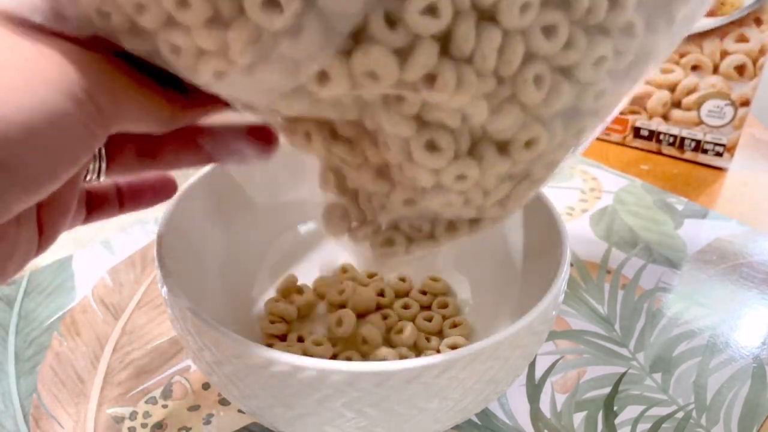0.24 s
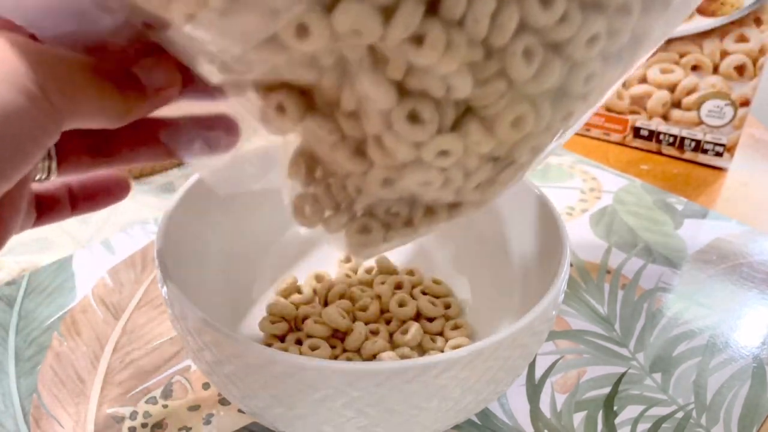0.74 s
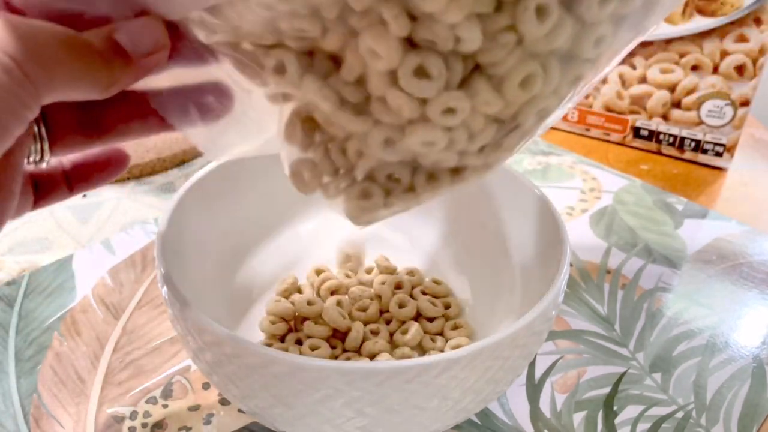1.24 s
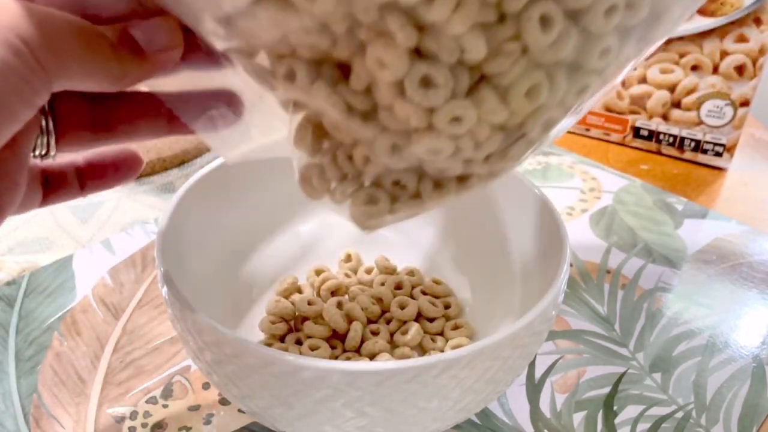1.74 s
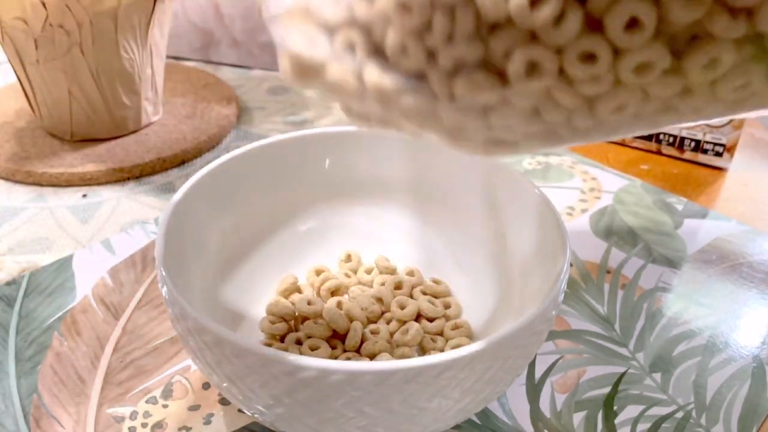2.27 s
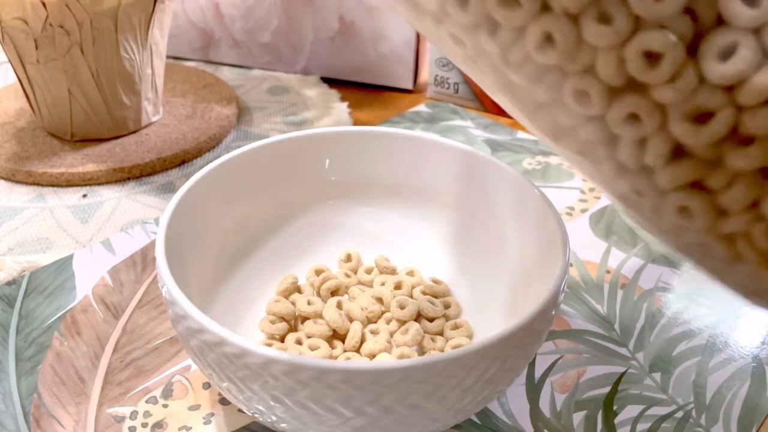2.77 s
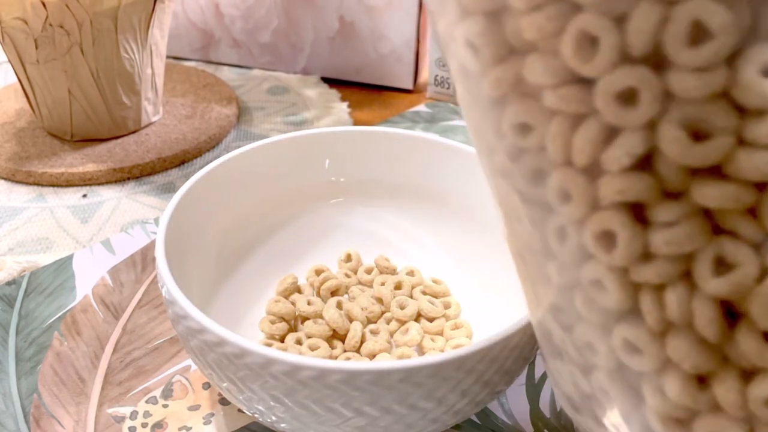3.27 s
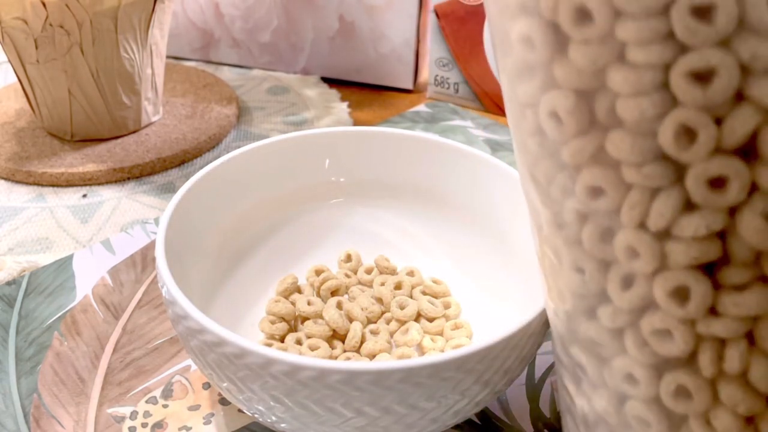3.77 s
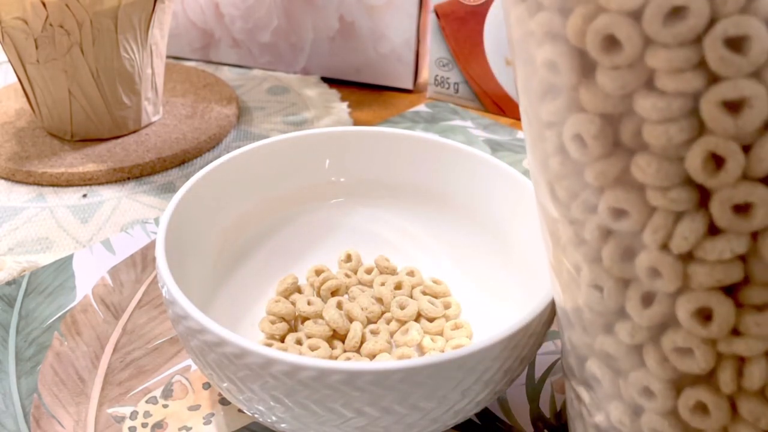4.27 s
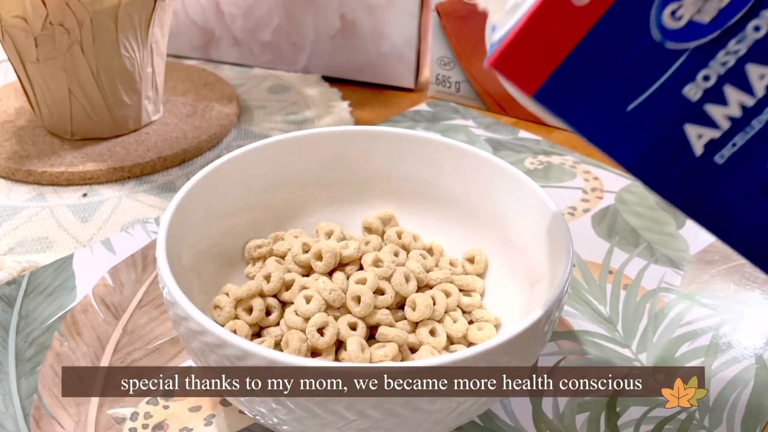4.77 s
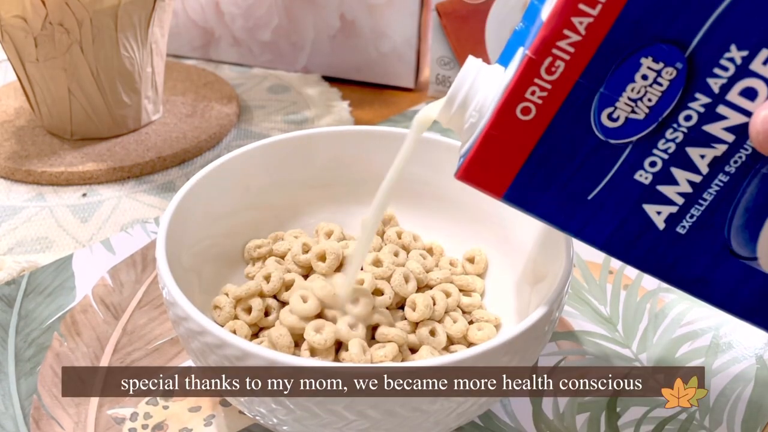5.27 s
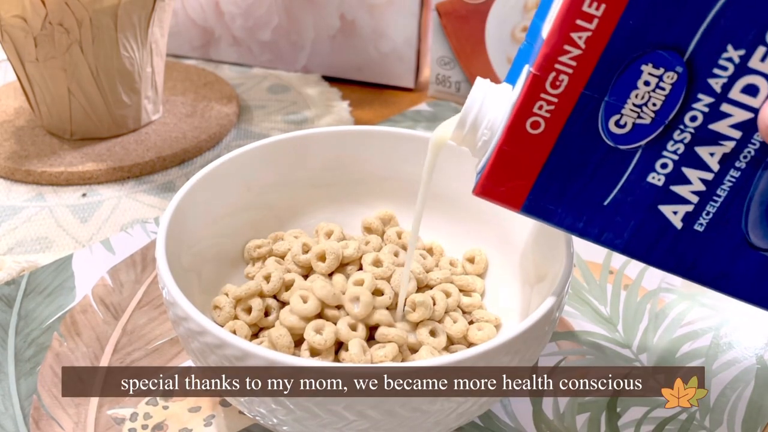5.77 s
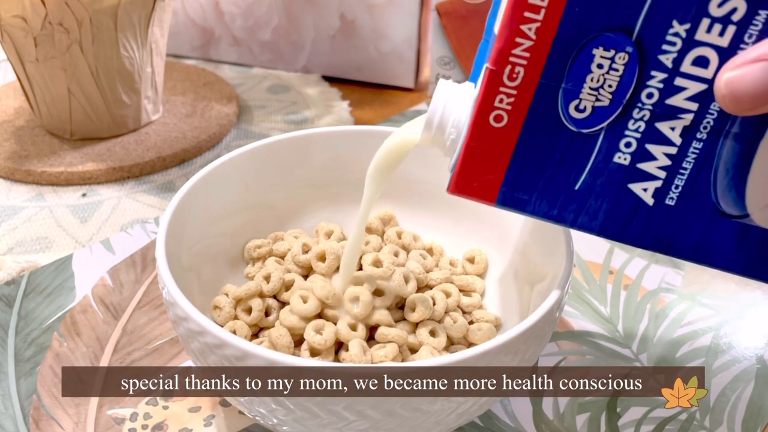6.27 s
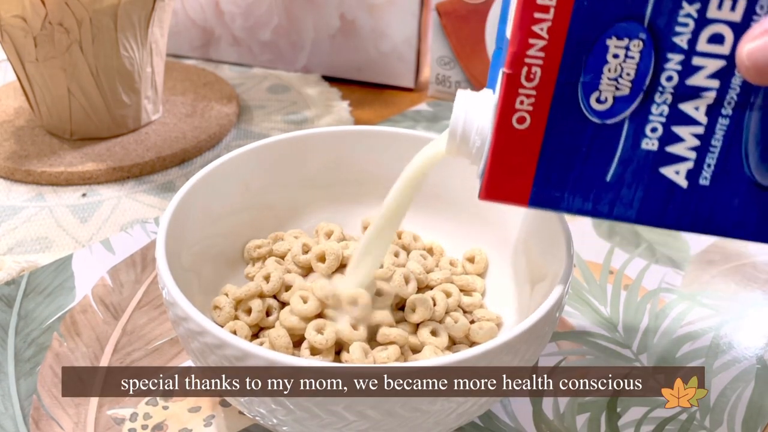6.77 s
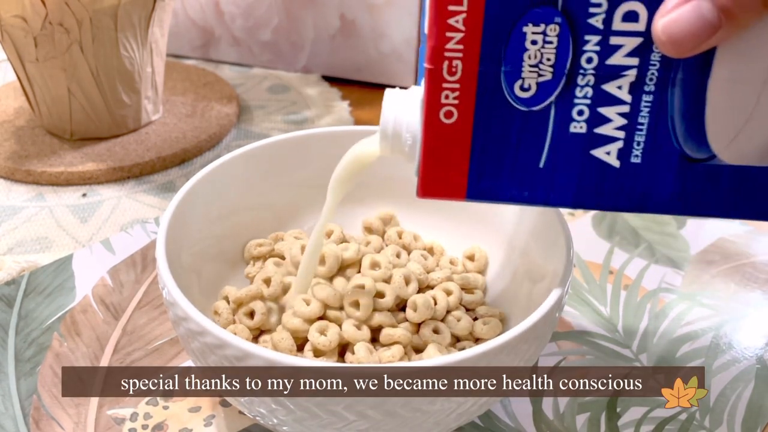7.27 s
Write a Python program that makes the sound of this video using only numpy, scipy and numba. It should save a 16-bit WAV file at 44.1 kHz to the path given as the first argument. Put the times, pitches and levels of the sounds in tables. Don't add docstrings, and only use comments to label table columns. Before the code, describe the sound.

Hard little cereal rings rattle in jerky bursts against film and each other, a few landing on bare ceramic with a bright ping. A near-pause, then the bag's load slumps and crackles as it is put down, slightly left of centre. The sound drops suddenly to faint room air and low rumble; milk falls in small wet gushes, growing livelier near the end. Close stereo phone pickup, indoors, almost no echo.

```python
import sys
import numpy as np
from scipy import signal
from scipy.fft import rfft, irfft
from scipy.io import wavfile
from scipy.ndimage import uniform_filter1d
from numba import njit

SR = 44100
rng = np.random.default_rng(int(sys.argv[2]) if len(sys.argv) > 2 else 0)


def boost_factor(decibels):
    exponent = np.asarray(decibels, float) / 20
    return 10 ** exponent


def file_out(sig):
    cols = np.atleast_2d(sig).T
    lim = np.clip(cols, -1, 1)
    pcm = np.round(lim * 32767).astype(np.int16)
    wavfile.write(sys.argv[1], SR, pcm)


N = 331632
TIME = np.arange(N) / SR
HZ = np.fft.rfftfreq(N, 1 / SR)
CUT_S = 4.532

# [t/s, hold/s, rattle level/dB]
SHAKES = [(0.0, 0.016, -32), (0.2, 0.076, -35), (0.405, 0.0013, -30.5), (0.482, 0.0042, -34),
          (0.59, 0.0044, -35.5), (0.676, 0.042, -36.5), (0.784, 0.011, -32.5), (0.87, 0.12, -32.5),
          (1.05, 0.021, -33.5), (1.146, 0.0039, -33.5), (1.21, 0.12, -34.5), (1.398, 0.01, -34.5),
          (1.5, 0.0026, -31.5), (1.577, 0.016, -33), (1.675, 0.0011, -33), (1.738, 0.023, -45)]
# [t/s, level/dB]
DRAG = [(0.0, -35), (1.698, -70), (1.81, -48.5), (2.11, -54.5), (2.136, -43.5), (2.341, -52),
        (2.612, -36.5), (2.92, -32.5), (3.02, -36.5), (3.23, -37), (3.334, -32), (3.44, -37.5),
        (3.52, -36.5), (3.673, -37.5), (3.779, -31), (3.934, -47.5), (4.26, -54), (4.526, -58)]
# [t/s, level/dB rel rattle]
TAUT = [
    (0, -9.5),
    (1.4, -21),
    (2.3, -21.5),
    (3.2, -12.5),
    (4.526, -11),
]
# [t/s, left minus right level/dB]
BAG_PAN = [
    (0, 2.5),
    (1.7, 3),
    (2.5, 2),
    (3.3, 0.5),
    (3.7, 2),
    (4.2, 1),
    (7.52, 6),
]
# [f/Hz, level/dB per Hz]
RATTLE = [(150, -9.5), (280, -7.5), (500, -9), (900, -6), (1400, -2.5), (2500, -5.5), (4000, -10),
          (6000, -14.5), (8000, -16), (11000, -21.5), (13500, -25)]
RATTLE_TOP = [(15000, -23), (15800, -27)]
# [f/Hz, level/dB per Hz]
KITCHEN = [(15, -32.5), (25, 0.5), (161, -1), (200, -7.5), (242, -4.5), (309, -12), (1400, -36),
           (4030, -48), (5000, -43), (5570, -50.5), (16000, -47)]
# [t/s, peak level/dB]
TICKS = [(0.014, -21), (0.0416, -24.5), (0.106, -19), (0.142, -22), (0.195, -23), (0.2164, -22),
         (0.2339, -21), (0.3306, -22.5), (0.348, -23), (0.378, -20), (0.399, -17), (0.5084, -26),
         (0.5521, -30), (0.5694, -20), (0.596, -20), (0.6165, -27), (0.6559, -27), (0.6704, -18.5),
         (0.7013, -20.5), (0.7013, -15), (0.7143, -13), (0.7722, -18), (0.794, -21), (0.852, -21.5),
         (0.91, -15), (0.9477, -19.5), (0.9725, -19.5), (1.0316, -22.5), (1.059, -17), (1.118, -23.5),
         (1.1243, -19.5), (1.1443, -22), (1.1623, -22.5), (1.193, -30), (1.1926, -15.5), (1.2745, -26),
         (1.3174, -19), (1.398, -23.5), (1.3975, -17.5), (1.4316, -23.5), (1.4601, -27), (1.477, -21.5),
         (1.495, -19), (1.511, -16), (1.5489, -28.5), (1.5673, -25), (1.5808, -19), (1.613, -26),
         (1.6396, -25), (1.684, -28.5), (1.6836, -18), (1.743, -34)]
LATE_TICKS = [(1.745, -31), (1.83, -40), (1.9138, -17), (1.9828, -42.5), (2.0092, -35.5), (2.0801, -38),
              (2.1305, -28), (2.137, -23.5), (2.1913, -30.5), (2.2043, -22), (2.2602, -32), (2.4045, -30),
              (2.4053, -31), (2.43, -33), (2.46, -23), (2.4805, -29), (2.5335, -30.5), (2.5899, -29),
              (2.6124, -25.5), (2.6807, -19), (2.76, -25), (2.8466, -22.5), (2.929, -17), (3.1246, -26.5),
              (3.155, -27.5), (3.1561, -22), (3.213, -23.5), (3.2977, -20), (3.3178, -19), (3.5893, -24.5),
              (3.796, -20.5), (3.8361, -20), (3.9566, -31), (4.0227, -35.5), (4.0404, -24.5),
              (4.155, -30.5), (4.2496, -43.5), (4.2888, -31.5), (4.3619, -35), (4.3675, -37), (4.39, -42),
              (4.4437, -39.5), (4.509, -49)]
# [t/s, peak level/dB]
SPATTER = [(5.0593, -62), (5.0577, -57), (5.0872, -50.5), (5.1656, -58.5), (5.2262, -58), (5.2458, -55),
           (5.3716, -59), (5.817, -74), (5.9814, -64.5), (6.1087, -62.5), (6.191, -63), (6.2984, -75),
           (6.4278, -72), (6.4701, -77), (6.4706, -64), (6.5199, -78), (6.7423, -57), (6.7863, -55),
           (6.8838, -56.5), (6.9142, -39), (7.0482, -47), (7.0705, -54.5), (7.1425, -54), (7.154, -53),
           (7.167, -45), (7.2401, -55), (7.2463, -48), (7.2648, -41.5), (7.3686, -57), (7.4229, -67.5),
           (7.4448, -63), (7.4655, -51.5), (7.4924, -53), (7.4938, -47.5)]
# [t/s, peak level/dB]
TINKS = [(0.0152, -20.5), (0.0548, -43.5), (0.1049, -22.5), (0.233, -19), (0.262, -42.5), (0.2796, -25.5),
         (0.3508, -24), (0.4046, -27), (0.439, -35.5), (0.612, -35.5), (0.656, -38.5), (1.2755, -29)]
# [f/Hz, level/dB, t60/s]
BOWL = [(5883, -9, 0.37), (5920, 0, 0.12), (11900, -21.5, .07), (13200, -17.5, .07), (11100, -19, .08)]
# [t/s, peak level/dB, f/Hz, bright part/dB rel]
SNAPS = [(0.0155, -16.5, 5960, -8.5), (0.106, -17, 6200, -12.5), (0.141, -22, 5810, -13.5),
         (0.2326, -21.5, 6085, -3.5), (0.6574, -25, 6030, -5.5), (0.7007, -19, 2830, -10),
         (0.7713, -20, 2484, -8.5), (0.852, -15.5, 2080, -7), (0.9729, -12, 2256, -7.5),
         (1.0595, -19.5, 2750, -8.5), (1.1243, -17, 3656, -9), (1.8498, -30, 1430, -28),
         (1.9131, -19, 1224, -10), (1.984, -31.5, 790, -35), (2.0087, -29, 1770, -7.5),
         (2.1196, -34.5, 1210, -12.5), (2.1354, -20.5, 2730, -9), (2.1916, -25.5, 2263, -12.5),
         (2.2044, -21.5, 5830, -8), (2.4048, -26.5, 1276, -13.5), (2.46, -26.5, 1930, -16.5),
         (2.613, -19.5, 1404, -9.5), (2.679, -21, 1470, -10.5), (2.7615, -22.5, 1548, -13),
         (3.1562, -15.5, 2400, -8), (3.2124, -25.5, 2266, -17), (3.3169, -19.5, 1918, -3),
         (3.5222, -19.5, 1337, -21), (3.8347, -25.5, 1240, -3), (4.0402, -21, 6100, -10.5)]
SETTLE = [(2.079, -35, 1260, -19), (2.26, -29, 5070, -11), (2.2752, -29.5, 4540, -6),
          (2.4305, -30, 1440, -5), (2.557, -33.5, 1650, -15), (3.9584, -31.5, 900, 2),
          (4.1532, -37, 2310, -8), (4.18, -36.5, 1370, 38), (4.299, -34, 2370, -9.5),
          (4.3674, -36.5, 2350, -19), (4.3902, -36.5, 4600, -4), (4.4432, -34, 1780, -9)]
# [t/s, peak level/dB, f/Hz, bright part/dB rel]
DROPS = [(5.0594, -45.5, 2060, -6), (5.1246, -44, 2140, -7.5), (5.2279, -56.5, 1670, -16),
         (5.2459, -51, 4180, -6.5), (5.3712, -56, 2324, -14), (6.1089, -61.5, 4110, -15),
         (6.4705, -58, 940, -9.5), (6.7444, -56, 1040, 4), (6.7844, -43.5, 856, -10),
         (6.8168, -51, 1990, -15), (6.8841, -54.5, 2260, 3), (6.9143, -40, 1380, -10.5),
         (7.0463, -54, 1160, -9), (7.0702, -50, 2500, -12), (7.154, -49.5, 5000, 4),
         (7.1654, -38, 4900, -5), (7.2403, -49.5, 1710, -3), (7.2656, -41, 2540, -7.5),
         (7.3231, -48.5, 1730, -7.5), (7.4653, -51.5, 1720, -15), (7.4878, -48, 1950, -9)]
STRAYS = [
    (5.981, -69, 3840, -12),
    (6.192, -66.5, 1080, -8),
]
# [t/s, peak level/dB]
CLICKS = [(0.399, -16.5), (0.462, -24.5), (0.4845, -20.5), (0.5686, -19), (0.5959, -22.5), (0.671, -18),
          (0.7137, -14), (0.7945, -14.5), (0.896, -18), (0.909, -16.5), (0.9487, -18.5), (1.0222, -22.5),
          (1.1435, -16), (1.194, -14.5), (1.2194, -17), (0.1183, -15), (1.2994, -21), (1.3203, -17),
          (1.3863, -26.5), (1.3992, -16), (1.433, -26), (1.46, -22.5), (1.509, -20.5), (1.567, -25),
          (1.614, -19.5), (1.6801, -24.5)]
# [t/s, peak level/dB]
CREASES = [(0.0418, -28), (0.1037, -22.5), (0.2189, -24), (0.3456, -27), (0.3985, -18.5), (0.4065, -20.5),
           (0.5067, -33), (0.5701, -23), (0.6699, -23.5), (0.7726, -23.5), (0.7931, -16.5), (0.8526, -27.5),
           (0.8589, -22), (1.058, -30), (1.1238, -21), (1.1627, -24.5), (1.1927, -19), (1.3962, -19),
           (1.4311, -24.5), (1.476, -20.5), (1.511, -18.5), (1.5798, -20.5), (1.6152, -27.5), (1.6851, -20)]
FOLDS = [(2.4046, -36), (2.4588, -27.5), (2.534, -23.5), (2.8452, -23), (2.933, -25.5), (2.971, -29),
         (3.1466, -21.5), (3.5229, -28), (3.5694, -29), (3.743, -27), (3.794, -30), (3.8084, -27.5),
         (3.8355, -25), (4.04, -31.5), (4.369, -32)]
# [t/s, peak level/dB]
KNOCKS = [(0.119, -22), (0.201, -22), (0.371, -23), (0.399, -21), (0.463, -24), (0.484, -22), (0.569, -25),
          (0.596, -24), (0.656, -30), (0.67, -25), (0.714, -19), (0.758, -25), (0.781, -24), (0.793, -21),
          (0.852, -25), (1.022, -27), (1.113, -26), (1.193, -21), (1.219, -21), (1.279, -21), (1.301, -23),
          (1.378, -26), (1.4, -24), (1.461, -28), (1.569, -23), (1.744, -33), (1.768, -33), (1.85, -34),
          (1.913, -47), (1.913, -23), (1.947, -39), (1.984, -30), (2.009, -36), (2.084, -42), (2.12, -34),
          (2.136, -28), (2.192, -35), (2.315, -42), (2.395, -33), (2.404, -31), (2.459, -29), (2.514, -32),
          (2.611, -27), (2.678, -21), (2.762, -23), (3.157, -25), (3.212, -27), (3.239, -30), (3.278, -25),
          (3.522, -23), (3.957, -39), (4.041, -31), (4.132, -41), (4.26, -42), (4.368, -41), (4.429, -42)]
# [t/s, peak level/dB, f/Hz]
THUMPS = [(0.237, -20.5, 344), (0.317, -26.5, 237), (0.403, -23.5, 367), (0.714, -22, 330),
          (0.783, -25.5, 312), (0.855, -31, 305), (0.907, -32, 423), (1.119, -30.5, 400), (1.194, -16, 265),
          (1.482, -26.5, 370), (1.567, -23, 428), (1.737, -30, 346), (2.136, -30.5, 305),
          (2.61, -26.5, 202), (2.915, -23.5, 242), (3.367, -26, 192), (3.4, -28, 150)]
# [t/s, peak level/dB, f/Hz]
GLUGS = [
    (6.593, -43.5, 257),
    (6.902, -47, 130),
    (7.322, -37.5, 290),
]
# [t/s, rumble level/dB]
TREMBLE = [(4.54, -68), (4.82, -59.5), (5.02, -70), (5.08, -62), (5.3, -64), (5.37, -60.5), (5.6, -68.5),
           (5.77, -66.5), (5.87, -61), (6.0, -62), (6.12, -70), (6.27, -63), (6.42, -68), (6.48, -57),
           (6.62, -50.5), (6.87, -59), (6.92, -51), (7.12, -60), (7.52, -55)]
# [t/s, hold/s, level/dB]
HUMS = [
    (4.8, 0.029, -69.5),
    (5.1, 0.22, -78),
    (5.55, .1, -76.5),
    (5.87, .1, -72),
    (6.1, 0.14, -76),
    (6.36, 0.022, -75),
    (6.72, 0.17, -56.5),
    (7.1, .12, -61),
    (7.38, .15, -59),
]
# [t/s, hold/s, splash level/dB, gurgle/dB rel, spray/dB rel]
GUSHES = [(4.57, 0.0022, -74, 6, -33), (5.071, 0.0567, -68.5, 5, 0.5), (5.243, 0.023, -70, 1, -17.5),
          (5.375, 0.013, -78, -15, -30), (6.477, 0.0021, -85, 21, -7), (6.768, 0.031, -70.5, 6.5, -13.5),
          (6.912, 0.0043, -61.5, -7, -33), (7.053, 0.061, -65.5, -12, -14), (7.171, .01, -58, -14, -24.5),
          (7.253, .03, -57, -27, -20), (7.491, .03, -59.5, -8, -18)]
# [f/Hz, level/dB per Hz]
SPLASH = [(500, -7.5), (800, -1), (1200, -8.5), (2200, -7), (4500, -15), (7000, -17), (11000, -21),
          (16000, -25)]
# [t/s, f/Hz, level/dB, t60/s]
BOWL_WET = (5.122, 1180, -66, .5)
# [t/s, peak level/dB]
POPS = [
    (5.4584, -76),
    (5.7374, -62.5),
    (5.8681, -76.5),
    (5.9249, -69),
    (6.1883, -63),
    (6.3537, -67),
    (6.4277, -62.5),
    (6.4404, -67),
]
# [f/Hz, share]
ALIKE_BASS = [(60, .86), (150, .8)]
ALIKE = [(300, .78), (700, 0.47), (2000, .53), (4000, 0.72), (6500, .8)]
ALIKE_TOP = [(7600, .996)]
# [f/Hz, phase/rad]
PORT_PHASE = [(0, 0), (520, 0.2), (1030, -0.4), (2240, -0.5), (2930, 0.7), (3620, -0.1), (5080, 0.5),
              (5860, -0.0), (7300, -2.1), (7800, -2.95), (8800, -3.35), (9470, -4.1), (10400, -6.0),
              (12800, -6.6), (13900, -9.35), (16500, -9.55)]


def over_time(table, outside=None):
    return np.interp(TIME, *np.transpose(table), left=outside, right=outside)


def along(table):
    hz, value = np.transpose(table)
    return np.interp(np.log(HZ + 1), np.log(hz + 1), value)


def band(x, colour, lo_hz, hi_hz, meter_hz):
    spec = rfft(x) * boost_factor(along(colour))
    inside = (HZ > meter_hz[0]) & (HZ < meter_hz[1])
    power = np.sum(np.abs(spec[..., inside]) ** 2) / (x.size / N)
    spec *= N / np.sqrt(2 * power)
    edges = (1 + (lo_hz / (HZ + 1)) ** 8) * (1 + (HZ / hi_hz) ** 8)
    return irfft(spec / np.sqrt(edges), N)


def bandpass(x, order, lo_hz, hi_hz):
    sos = signal.butter(order, [lo_hz, hi_hz], "bandpass", fs=SR, output="sos")
    return signal.sosfilt(sos, x)


@njit
def rings(at, hz, t60, size):
    y = np.zeros(N)
    for k in range(len(at)):
        turn = np.exp((2j * np.pi * hz[k] - np.log(1000) / t60[k]) / SR)
        z = size[k] + 0j
        for i in range(at[k], min(N, at[k] + int(t60[k] * SR))):
            y[i] += z.imag
            z *= turn
    return y


def flicker(hold):
    steps = np.repeat(rng.standard_normal(N // hold + 1), hold)[:N]
    return 1.3 * uniform_filter1d(steps, hold)


def surges(table, rise_db_s, fall_db_s):
    s, hold, db = np.array(table)[:, :3].T[:, :, None]
    rise_db = rise_db_s * np.maximum(s - TIME, 0)
    fall_db = fall_db_s * np.maximum(TIME - s - np.abs(hold), 0)
    return boost_factor(db - rise_db - fall_db)


def bursts(count, length_s, lo_hz, hi_hz):
    lengths_s = length_s * boost_factor(0.52 * rng.standard_normal((count, 1)))
    t = np.arange(768) / SR / lengths_s
    noise = t * np.exp(-t ** 2 / 2) * rng.standard_normal(t.shape)
    noise = bandpass(noise, 2, lo_hz, hi_hz)
    return noise / np.abs(noise).max(axis=1, keepdims=True)


def place(table, shapes, spread=1):
    out = np.zeros((2, N + shapes.shape[1] + 4))
    ways = spread * rng.uniform(-1, 1, len(table))
    for (s, db, *_), shape, way in zip(table, shapes, ways):
        shape = shape / np.abs(shape).max()
        for port, lag in zip(out, (max(way, 0), max(-way, 0))):
            start = int(s * SR + 1.6 * lag)
            port[start:start + len(shape)] += boost_factor(db - 1.8 * lag) * shape
    return out[:, :N]


def crackle(rate, spread_db, cycles, wash_db):
    chance = rng.random((int(rate * N / SR), 6))
    size = boost_factor(-spread_db * np.log(chance[:, 1] + 0.013))
    out = 0
    for k in range(3):
        hz = 180 * (17000 / 180) ** ((k + chance[:, 2 + k]) / 3)
        at = chance[:, 0] * N + 60 * k * chance[:, 5]
        t60 = cycles / hz + 0.0059
        out = out + rings(at.astype(np.int64), hz, t60, size * hz / np.sqrt(hz + 800))
    surge = boost_factor(1.3 * flicker(500))
    return surge * (out / np.std(out) + boost_factor(wash_db) * rng.standard_normal(N))


def motion():
    shaken = surges(SHAKES, rise_db_s=227, fall_db_s=193)
    power = boost_factor(over_time(DRAG, outside=-200)) ** 2 + np.sum(shaken ** 2, axis=0)
    db = 10 * np.log10(power)
    inertia_s = 0.08
    return db, uniform_filter1d(np.maximum(db, DRAG[-1][1]), int(inertia_s * SR))


def film_ticks(rate, spread_db, fall_s, wash_db):
    size = (rng.random(N) < rate / SR) * boost_factor(spread_db * rng.exponential(size=N))
    flash = signal.lfilter([1], [1, -np.exp(-1 / (fall_s * SR))], size)
    return (flash + boost_factor(wash_db)) * rng.standard_normal((2, N))


def bag(db, slow_db):
    jerk_db = db - slow_db
    boom_follow, quiet_gain = .65, 0.24
    boom_db = -2 + (1 - boom_follow) * np.minimum(-jerk_db, 9) - quiet_gain * (slow_db + 36.5)
    hiss_db = over_time(TAUT) + 0.35 * np.clip(jerk_db, -9, 9)
    slide = np.clip((TIME - 1.7) / 0.33, 0, 1)
    shaken, sliding = np.sqrt(1 - slide), np.sqrt(slide)
    grains = np.array([shaken * crackle(900, 2.4, 13.0, -1.9) + sliding * crackle(2200, 2.3, 7.8, -0.62)
                       for _ in range(2)])
    rattle = band(grains, RATTLE, 570, 14000, (600, 7000))
    boom = boost_factor(boom_db) * band(grains, RATTLE, 100, 520, (150, 550))
    film = sliding * grains + shaken * film_ticks(130, 4.1, 0.0055, -2.5)
    hiss = boost_factor(hiss_db) * band(film, RATTLE + RATTLE_TOP, 6100, 17000, (9500, 13000))
    return boost_factor(db - 2.0) * (rattle + boom + hiss)


def kitchen(slow_db):
    def noise(lo_hz, hi_hz):
        return band(rng.standard_normal((2, N)), KITCHEN, lo_hz, hi_hz, (45, 140))

    before_cut = TIME < CUT_S
    handled_db = -49.5 + 0.19 * (slow_db + 37.0)
    db = np.where(before_cut, handled_db, over_time(TREMBLE) - 1.0) + flicker(2000)
    waver = flicker(2500)
    rumble = noise(45, 125) * boost_factor(db + 0.8 * waver)
    lift_s, ramp_s = 6.45, 0.17
    air_db = np.where(before_cut, -62.5, np.interp(TIME, [lift_s, lift_s + ramp_s], [-67, -61]))
    air = noise(420, 17000) * boost_factor(air_db + 0.68 * waver)
    murmur = noise(125, 400) * boost_factor(np.minimum(db, -62) - 2.5 + .5 * flicker(2000))
    wobble = np.cumsum(flicker(2000)) / SR
    hum = np.sin(2 * np.pi * (234 * TIME + wobble))
    hum = hum * surges(HUMS, rise_db_s=200, fall_db_s=93).sum(axis=0)
    return rumble + air + murmur + hum * boost_factor(.5 * waver) * np.array([[1], [.3]])


def hard_ticks(table, length_s, gain_db, top_db):
    crack = place(table, bursts(len(table), length_s, 1500, 7200), 0.55)
    top = place(table, bursts(len(table), length_s, 9000, 17500), .1)
    return boost_factor(gain_db) * (crack + boost_factor(top_db) * top)


def bowl():
    s, db = np.transpose(TINKS)
    at, ones = (s * SR).astype(np.int64), np.ones(len(s))
    out = np.zeros(N)
    for k, (hz, mode_db, t60) in enumerate(BOWL):
        scatter_db = 2.8 * rng.standard_normal(len(s)) * (k > 1)
        out += rings(at, hz * ones, t60 * ones, boost_factor(db + mode_db - 7.5 + scatter_db))
    return out


def snaps(table, length_s, sharpness, ring_db):
    count, hz, bright_db = len(table), np.array(table)[:, 2], np.array(table)[:, 3:]
    bright = np.minimum(boost_factor(bright_db + 9.0), .97)
    knock = bursts(count, length_s, 500, 2800)
    crack = bursts(count, .7 * length_s, 2800, 7800)
    fizz = bursts(count, length_s, 8700, 17000)
    blow = np.sqrt(1 - bright ** 2) * knock + bright * (crack + boost_factor(-9.5) * fizz)
    ring = np.array([signal.lfilter(*signal.iirpeak(f, sharpness, SR), b) for f, b in zip(hz, blow)])
    return place(table, blow + boost_factor(ring_db) * ring / np.abs(ring).max(axis=1, keepdims=True))


def creases():
    table = CREASES + FOLDS
    return boost_factor(7.5) * place(table, bursts(len(table), 0.00059, 3700, 22000), .15)


def tumbling():
    chance = rng.standard_normal((len(CLICKS), 2))
    return [(s, db, 1430 * (1 + 0.021 * a), -6.5 + 0.73 * b) for (s, db), (a, b) in zip(CLICKS, chance)]


def knocks():
    return boost_factor(-5) * place(KNOCKS, bursts(len(KNOCKS), .0013, 450, 2400), .7)


def thumps(table, fall_s, tail_db):
    t, hz = np.arange(8192) / SR, np.array(table)[:, 2:3]
    cycles = hz * (.75 * t + 1.5 * .003 * (1 - np.exp(-t / 0.004)))
    swell = (1 - np.exp(-np.maximum(t - .002, 0) / 0.00091)) ** 2
    tone = np.sin(2 * np.pi * cycles) * np.exp(-t / fall_s)
    rumble = bandpass(rng.standard_normal(cycles.shape), 3, 80, 450) * np.exp(-t / (2.81 * fall_s))
    return place(table, swell * (tone + boost_factor(tail_db) * rumble))


def milk():
    gush = surges(GUSHES, rise_db_s=650, fall_db_s=282.5)
    trickle = boost_factor(-86.5) * (TIME > CUT_S)
    gurgle_db, spray_db = np.array(GUSHES)[:, 3:].T

    def gain(rel_db, trickle_db):
        return trickle * boost_factor(trickle_db) + np.sqrt(boost_factor(rel_db) ** 2 @ gush ** 2)

    grains = np.array([crackle(580, 1.5, 24.7, -1.8) for _ in range(2)])
    gurgle = gain(gurgle_db, 1.5) * band(grains, SPLASH, 600, 1310, (650, 1600))
    splash = gain(np.zeros(len(gush)), 0) * band(grains, SPLASH, 1560, 8570, (1600, 7000))
    spray = gain(spray_db, -18) * band(grains, SPLASH, 5700, 17020, (9500, 13000))
    s, hz, ring_db, t60 = np.array([BOWL_WET]).T
    ring = uniform_filter1d(rings((s * SR).astype(np.int64), hz, t60, boost_factor(ring_db)), size=8)
    return boost_factor(-3.5) * (gurgle + splash + spray) + ring * np.array([[1], [.3]])


def pops():
    return boost_factor(4.0) * place(POPS, bursts(len(POPS), 0.0008, 8500, 15500), .3)


def ports(pair):
    alike = np.clip(along(ALIKE_BASS + ALIKE + ALIKE_TOP), 0, 1)
    near, wide = rfft(pair)
    wide = np.sqrt((1 - alike) / (1 + alike)) * wide
    return irfft(np.array([near + wide, near - wide]), N)


def reflected(x):
    t = np.arange(4096) / SR
    decay = np.exp(-t * np.log(1000) / 0.056) * boost_factor(-27.0) * (t > .001)
    smear = uniform_filter1d(rng.standard_normal((2, len(t))) * decay, size=3)
    return x + signal.fftconvolve(x, smear, axes=1)[:, :N]


def to_side(x):
    sos = signal.butter(2, [450, 6500], "bandpass", fs=SR, output="sos")
    middle = signal.sosfiltfilt(sos, x)
    pan_db = over_time(BAG_PAN)
    return x - middle + middle * boost_factor(np.array([pan_db, -pan_db]) / 2)


def scene():
    db, slow_db = motion()
    hits = hard_ticks(TICKS, .0006, -2, -8.5) + hard_ticks(LATE_TICKS, 0.00031, -4, -11)
    hits = hits + bowl() + snaps(SNAPS + SETTLE + tumbling(), 0.0012, 8.4, -5)
    hits = hits + creases() + knocks() + thumps(THUMPS, 0.005, 2.0)
    hits = hits + snaps(DROPS + STRAYS, 0.00088, 6.7, 0.83) + hard_ticks(SPATTER, 0.00082, -1, -16.5)
    hits = hits + pops() + thumps(GLUGS, 0.0098, 8.8)
    heard = reflected(hits) + ports(bag(db, slow_db) + milk())
    return to_side(heard) + ports(kitchen(slow_db))


def roll_off(x):
    return signal.sosfilt(signal.butter(12, 16980, fs=SR, output="sos"), x)


def record(dry):
    turn = np.exp(.5j * along(PORT_PHASE))
    bass_cut = 1 / np.sqrt(1 + (46 / (HZ + 1)) ** 5)
    top_cut = boost_factor(-13 / (1 + np.exp(np.clip((15900 - HZ) / 90, -50, 50))))
    rounded = np.tanh(1.5 * dry) / 1.5
    mix = irfft(rfft(rounded) * bass_cut * top_cut * np.array([turn, turn.conj()]), N)
    return roll_off(mix)


dry = scene()
out = record(dry)
file_out(out)
```